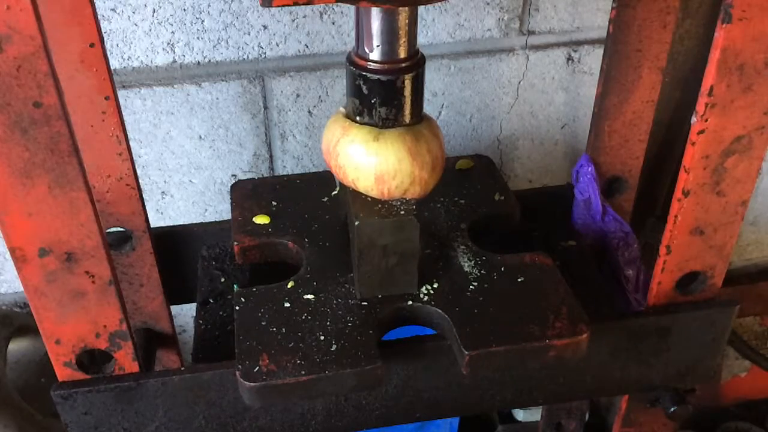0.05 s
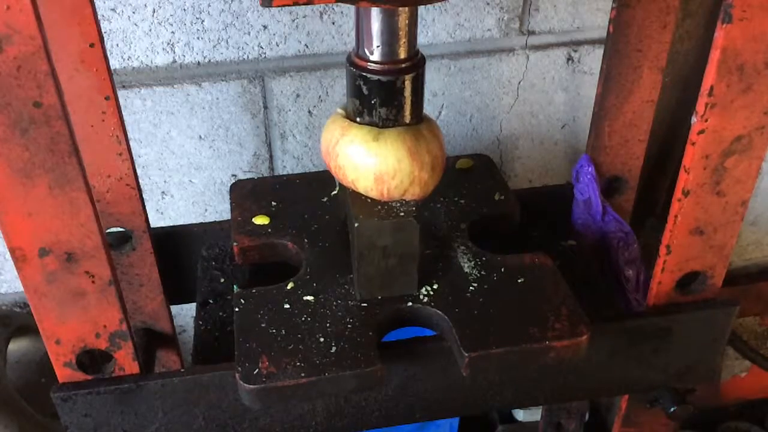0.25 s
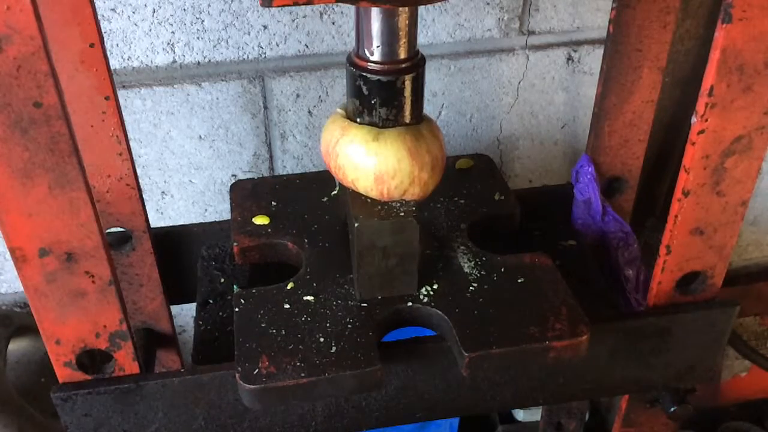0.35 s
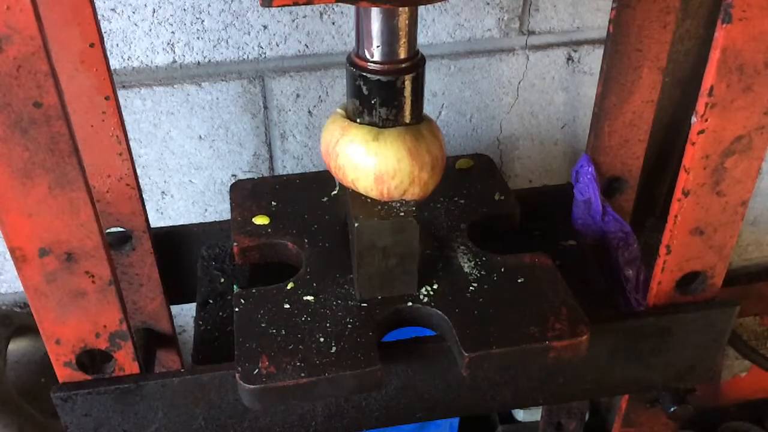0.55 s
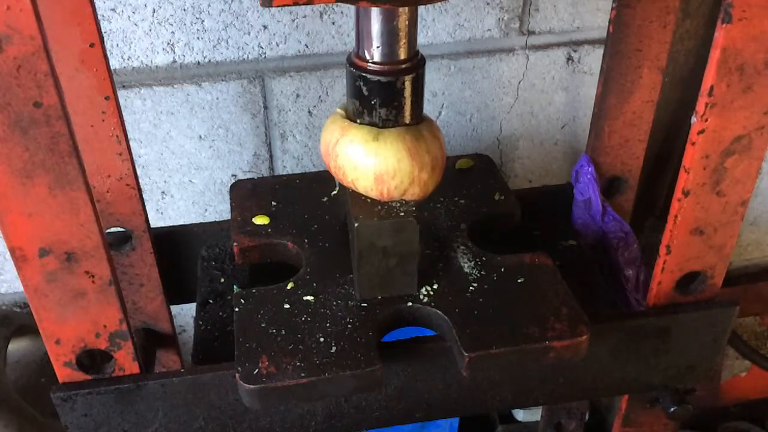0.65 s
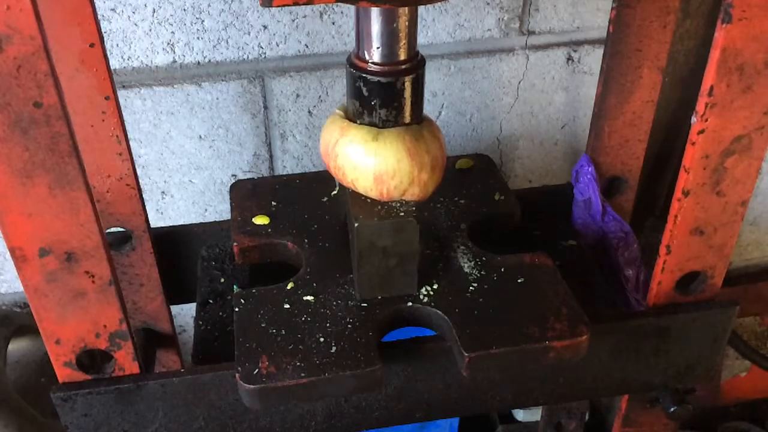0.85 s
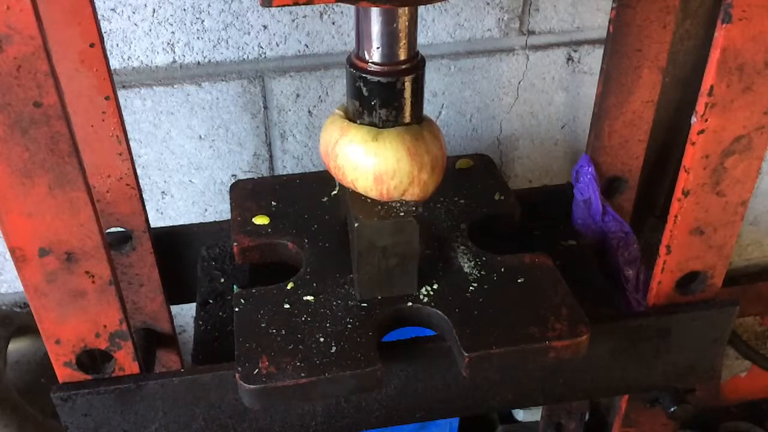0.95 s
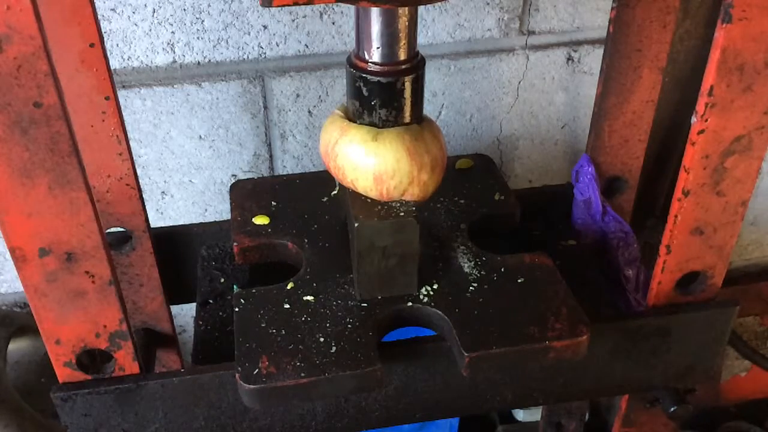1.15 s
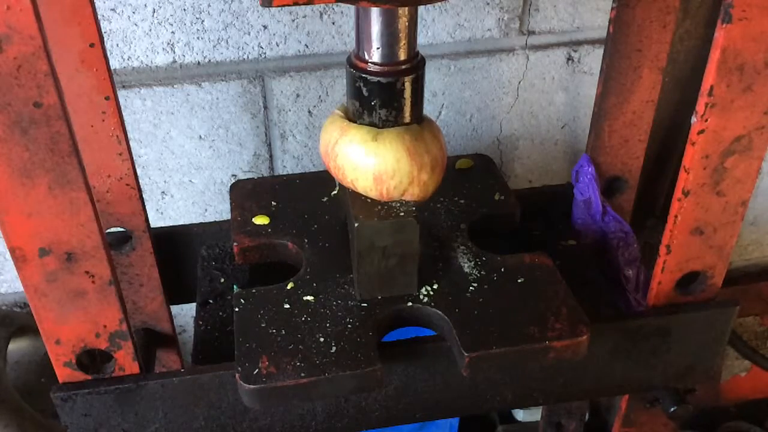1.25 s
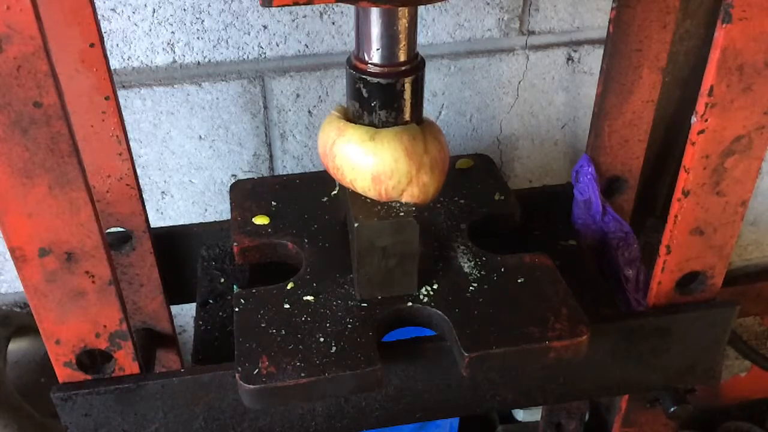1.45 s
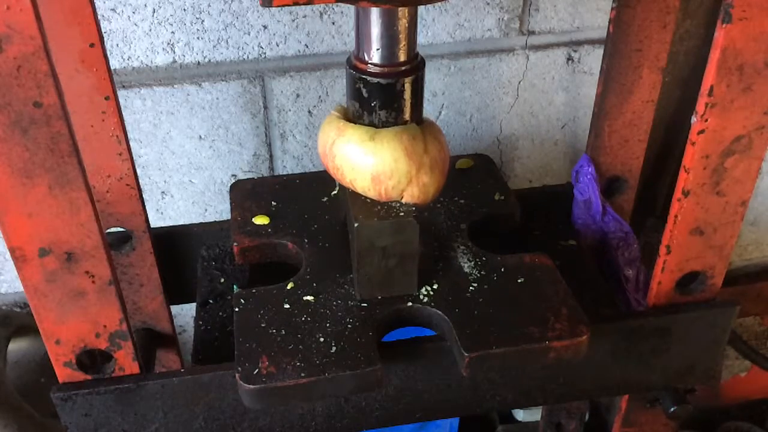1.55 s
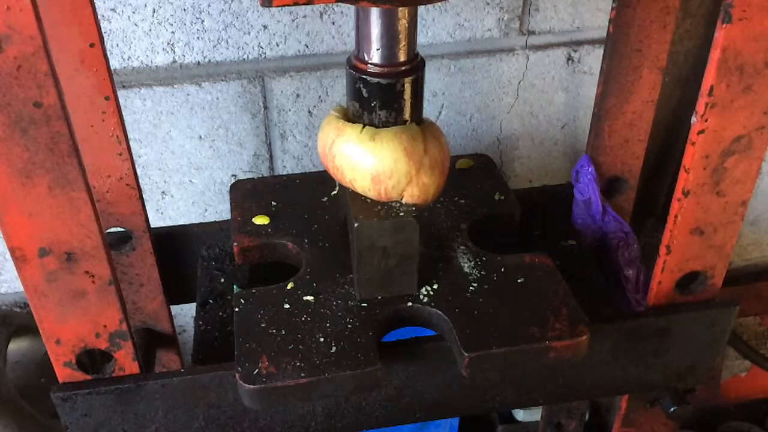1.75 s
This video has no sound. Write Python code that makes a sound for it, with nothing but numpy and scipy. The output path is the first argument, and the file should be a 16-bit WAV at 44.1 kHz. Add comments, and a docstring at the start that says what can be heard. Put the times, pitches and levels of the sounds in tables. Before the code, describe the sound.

Sharp cracks and a soft fizz of juice come from an apple squeezed in a workshop hydraulic press. Three pump strokes knock faintly: the first brings cracking and a thud, the second scattered snaps, the third crowded cracks that thin out.

```python
"""A hydraulic press slowly crushes an apple in a workshop, over low room noise and a faint hum.
A pump stroke knocks through the steel frame and pushes the ram on: juice fizzes out of the flesh,
the skin cracks, and at about 0.23 s the fruit gives way and the frame thuds. The piston returns softly.
A second stroke near 0.7 s brings weaker fizz and a few single cracks. After the third, near 1.3 s,
the cracks crowd together, then thin out as the piston returns once more."""
import sys
import numpy as np
from scipy import signal
from scipy.fft import rfft, irfft, next_fast_len
from scipy.io import wavfile

SR = 44100
rng = np.random.default_rng(int(sys.argv[2]) if len(sys.argv) > 2 else 0)


def output_pcm(signal):
    """Save a mono or channel-first signal as 16-bit PCM at the path in sys.argv[1].

    Samples are clipped to [-1, 1] before scaling.
    """
    pcm = np.clip(np.atleast_2d(signal).T, -1, 1) * 32767
    wavfile.write(sys.argv[1], SR, np.round(pcm).astype(np.int16))


N = 79380
T = np.arange(N) / SR
SIZE = next_fast_len(N + SR // 2)
HZ = np.maximum(np.fft.rfftfreq(SIZE, 1 / SR), 1)
CUTOFF_HZ = 15200


def from_db(db):
    """Amplitude ratio of a level in decibels."""
    return 10 ** (np.asarray(db) / 20)


def unit_energy(x):
    """Normalisation to an energy of 1."""
    return x / np.sqrt(np.sum(x ** 2) + 1e-20)


def unit_rms(x):
    """Normalisation to an rms of 1."""
    return unit_energy(x) * np.sqrt(len(x))


def decay(t60):
    """Exponential damping: 60 dB in t60 seconds."""
    return np.exp(-np.minimum(np.log(1000) * T / t60, 40))


def spectrum_db(points):
    """Spectral envelope through (Hz, dB) points, interpolated in log frequency."""
    hz, db = np.transpose(points)
    return np.interp(np.log(HZ), np.log(hz), db)


def resonance(hz, half_width_hz):
    """Lorentzian resonance curve of height 1."""
    return 1 / (1 + ((HZ - hz) / half_width_hz) ** 2)


def colour(x, db):
    """Minimum-phase filtering: folding the cepstrum makes the given spectrum causal."""
    cepstrum = irfft(np.log(from_db(db)), SIZE)
    cepstrum[1:SIZE // 2] *= 2
    cepstrum[SIZE // 2 + 1:] = 0
    return irfft(rfft(x, SIZE) * np.exp(rfft(cepstrum)), SIZE)[:N]


def butterworth(x, hz, kind, order):
    """Maximally flat low- or high-pass filtering."""
    return signal.sosfilt(signal.butter(order, hz, kind, fs=SR, output="sos"), x)


def add(out, start_s, x):
    """Superposition of x on out from start_s on."""
    start = int(start_s * SR)
    out[start:] += x[:N - start]


def ringing(modes):
    """Modal impulse response: damped sinusoids of alternating sign."""
    return sum((-1) ** k * from_db(db) * decay(t60) * np.sin(2 * np.pi * hz * T)
               for k, (hz, db, t60) in enumerate(modes))


def struck(blows, modes):
    """Impact excitation: a softer blow has a lower corner frequency and excites fewer high modes."""
    out, ring = np.zeros(N), ringing(modes)
    for start_s, db, corner_hz in blows:
        add(out, start_s, from_db(db) * butterworth(ring, corner_hz, "low", order=2))
    return out


def background():
    """Low room noise and a hum that wavers by random amplitude and frequency modulation."""
    # Each row: frequency in Hz, relative level in dB.
    air_spectrum = [(20, -40), (45, -5.5), (65, -0.5), (100, -1), (140, -8.5), (280, -15), (430, -8),
                    (650, -17.5), (1300, -15.5), (2500, -29), (5000, -40.5), (15000, -39.5)]
    hum_hz, waver_hz, waver_db = 201.7, 1.62, 3.5
    air, waver = rng.standard_normal((2, SIZE))
    air = irfft(rfft(air) * from_db(spectrum_db(air_spectrum)), SIZE)[:N]
    waver = unit_rms(irfft(rfft(waver) * resonance(0, waver_hz), SIZE)[:N])
    phase = 2 * np.pi * np.cumsum(hum_hz + waver_hz * waver) / SR
    hum = from_db(waver_db * waver) * np.sin(phase)
    return from_db(-63.5) * unit_rms(air) + from_db(-69) * unit_rms(hum)


def reverberation(x, t60):
    """Reflections from the block walls build a diffuse field that decays exponentially."""
    # Each row: frequency in Hz, gain in dB.
    room_spectrum = [(60, -8), (500, -0.5), (1000, 2.5), (2300, 3), (5000, -2.5), (15000, 6.5)]
    build_s = 0.0062
    tail = unit_energy(rng.standard_normal(N) * decay(t60) * (1 - np.exp(-T / build_s)))
    return signal.fftconvolve(x, colour(tail, spectrum_db(room_spectrum)))[:N]


def linkage():
    """The pump linkage rattles: damped noise bursts, with the free vibration of a small steel part."""
    # Each row: start in seconds, noise level in dB, its t60 in seconds, level of the steel ring in dB.
    rattles = [(0, -57.5, 0.15, -56), (0.042, -42.5, 0.068, -44.5), (0.349, -56, 0.16, -73),
               (0.358, -57, 0.042, -76), (.656, -55.5, 0.064, -62.5), (.695, -57.5, 0.17, -70),
               (.981, -54.5, 0.045, -78), (.994, -51.5, 0.043, -76), (1.2895, -54, .05, -64),
               (1.326, -49.5, .05, -70)]
    # Each row: frequency in Hz, relative level in dB.
    rattle_spectrum = [(100, 2.5), (400, 2.5), (1000, -3), (1500, -8.5), (1880, 0.5), (2300, -9.5),
                       (3200, -14), (6000, -17), (15000, -24.5)]
    # Each row: frequency in Hz, level in dB, t60 in seconds.
    steel_modes = [(5108, 0.5, 0.032), (5155, -3.5, 0.095), (5670, -3, .04)]
    attack_s = 0.0015
    out, steel = np.zeros(N), ringing(steel_modes)
    for start_s, db, t60, steel_db in rattles:
        noise = unit_rms(colour(rng.standard_normal(N), spectrum_db(rattle_spectrum)))
        envelope = (1 - np.exp(-T / attack_s)) * decay(t60)
        add(out, start_s, from_db(db) * noise * envelope / envelope.max() + from_db(steel_db) * steel)
    return out


def piston_returns():
    """Soft impacts excite the piston's modes as it returns."""
    # Each row: start in seconds, level in dB, corner frequency in Hz.
    blows = [(.334, -50.5, 497), (.363, -53, 704), (.9665, -46, 480), (.9955, -51, 905),
             (1.604, -45.5, 494), (1.632, -52.5, 865)]
    # Each row: frequency in Hz, level in dB, t60 in seconds.
    piston_modes = [(125, -14, 0.089), (210, 2, 0.036), (410, -4.5, 0.041), (480.4, -2, 0.093),
                    (546, 0.5, 0.058)]
    return struck(blows, piston_modes)


def pump_knocks():
    """Structure-borne sound: each pump stroke knocks through the steel."""
    # Each row: start in seconds, level in dB, corner frequency in Hz.
    blows = [(.0325, -40.5, 603), (.0425, -38.5, 313), (.6615, -53, 1000), (.6895, -39.5, 383),
             (.6975, -38, 646), (.706, -35, 197), (.786, -55, 600), (1.291, -49, 1000), (1.3195, -40, 760),
             (1.3295, -36, 715), (1.351, -65, 445)]
    # Each row: frequency in Hz, level in dB, t60 in seconds.
    pump_modes = [(131, -10.5, 0.067), (222.6, -3.5, 0.046), (310, -4.5, 0.034), (409.6, 1.5, 0.053),
                  (476, 2, 0.024), (671, -16, 0.15), (953, -5, 0.025), (1164, -10, 0.041)]
    return struck(blows, pump_modes)


def frame_thud():
    """Transient excitation: the frame's low modes ring as the apple gives way."""
    # Each row: start in seconds, level in dB, corner frequency in Hz.
    blows = [(.2225, -41, 304), (.2292, -16.5, 470), (.2352, -21, 950), (.2665, -26.5, 194),
             (.2870, -37, 219)]
    # Each row: frequency in Hz, level in dB, t60 in seconds.
    frame_modes = [(101, -21, 0.014), (149, -10, 0.14), (155.5, 0.5, 0.033), (222, -11.5, 0.088),
                   (264.1, -8.5, 0.16), (343, -11.5, 0.02), (423, -9.5, 0.047), (537, -13.5, 0.036),
                   (640, -6, 0.07), (788, -12, 0.031), (909, -9.5, 0.041)]
    return struck(blows, frame_modes)


def press_bed(x):
    """Resonances of the press bed colour the sound of the fruit."""
    # Each row: centre in Hz, half-width in Hz, gain at the centre in dB.
    bands = [(436, 150, 4.5), (772, 51, 3.4), (1167, 20, 4.6), (1700, 114, 3.9), (1900, 44, 0.75),
             (2696, 95, 4.76), (9400, 210, -0.5)]
    return colour(x, sum(db * resonance(hz, half_width) for hz, half_width, db in bands))


def juice():
    """Shot noise: countless cells burst as tiny grains over a fine hiss, one swell per pump stroke."""
    # Each row: time in seconds, level in dB.
    swells = [(0, -62.5), (.065, -70), (0.104, -59.5), (.165, -52.5), (.196, -53.5), (0.204, -38),
              (0.234, -45.5), (.252, -65.5), (.32, -68.5), (.55, -76.5), (.70, -75.5), (.745, -62.5),
              (.80, -57), (.88, -60), (.93, -66), (1.0, -65), (1.06, -71.5), (1.18, -72.5), (1.36, -66.5),
              (1.385, -56), (1.45, -51), (1.468, -48), (1.50, -51), (1.545, -53.5), (1.58, -59.5),
              (1.65, -62), (1.71, -65.5), (1.8, -70)]
    # Each row: frequency in Hz, relative level in dB.
    fizz_spectrum = [(200, -34), (700, -4.5), (1200, -5), (2600, -0.5), (4500, 1.5), (7000, 0.5),
                     (10000, 2.5), (15000, -1.5)]
    grains_per_s, spread_db, grain_t60, hiss_share = 1000, 4, 0.006, 0.6
    sizes = from_db(spread_db * np.minimum(rng.exponential(1, N), 5)) * rng.choice([-1, 1], N)
    onsets = rng.random(N) < grains_per_s / SR
    # Incoherent grains add in power.
    power = np.abs(signal.fftconvolve((sizes * onsets) ** 2, decay(grain_t60) ** 2)[:N])
    grains = unit_rms(np.sqrt(power) * rng.standard_normal(N))
    fizz = np.sqrt(1 - hiss_share) * grains + np.sqrt(hiss_share) * rng.standard_normal(N)
    times, db = np.transpose(swells)
    return from_db(np.interp(T, times, db)) * unit_rms(colour(fizz, spectrum_db(fizz_spectrum)))


def cavity(fundamental_hz):
    """Cavity resonance: a fresh split rings as a small hollow."""
    # Each row: multiple of the fundamental, spectral peak in dB, cycles to decay by 60 dB.
    partials = [(1, 10, 17.2), (2, 1, 66), (3.4, 3.5, 90)]
    modes = []
    for ratio, peak_db, cycles in partials:
        hz = ratio * fundamental_hz
        t60 = cycles / hz
        resonant_gain = t60 * SR / (2 * np.log(1000))
        if hz < CUTOFF_HZ:
            modes.append((hz, peak_db - 20 * np.log10(resonant_gain), t60))
    return ringing(modes)


def cracks():
    """Fracture of skin and flesh: a snap, then the flesh, the cavity and the steel bed plate ring."""
    # Each row: start in seconds, level in dB, high-pass corner in Hz (big cracks tend to reach lower),
    # cavity fundamental in Hz, treble gain in dB, t60 of the flesh in seconds.
    fractures = [(0.1479, -41, 3500, 11000, 8.5, 0.016), (0.1772, -20.5, 1920, 3220, 2, 0.053),
                 (0.204, -19.5, 2440, 2470, 5, 0.036), (0.2063, -14.5, 1990, 9350, -13, 0.031),
                 (0.2139, -18, 2250, 2700, -9, 0.048), (0.2314, -21.5, 880, 3240, 1, 0.079),
                 (0.2811, -33.5, 2500, 3900, 4, 0.037), (.3012, -42, 2500, 4500, -9, .02),
                 (0.758, -30.5, 2000, 6000, 3.5, 0.023), (.9167, -10.5, 586, 832, 1, 0.045),
                 (0.9355, -40, 980, 10900, 4, 0.019), (.9925, -35, 1210, 2240, 6, 0.031),
                 (1.1846, -23.5, 1530, 4000, -9, 0.06), (1.1986, -5, 1520, 1138, -11.5, 0.044),
                 (1.3721, -15, 1590, 836, -8, 0.04), (1.4005, -31, 1800, 2980, 7, 0.03),
                 (1.4386, -39.5, 2000, 9500, 11, .02), (1.4546, -32, 2000, 9900, 14, 0.018),
                 (1.4558, -23, 1810, 9400, -5, 0.0053), (1.4586, -6.5, 290, 1624, 6.5, 0.041),
                 (1.4668, -33.5, 2000, 12300, 16, 0.01), (1.472, -17, 1200, 2750, 5, 0.065),
                 (1.4749, -26.5, 1510, 9300, 14, 0.038), (1.4857, -35.5, 2500, 9400, 22.5, 0.0098),
                 (1.4967, -28, 2500, 9600, 9, 0.034), (1.5023, -15.5, 1110, 1320, 0, 0.037),
                 (1.5132, -32, 1500, 9000, -3, 0.035), (1.527, -23.5, 2030, 2780, 6, 0.094),
                 (1.5355, -20, 2000, 2600, -4, 0.037), (1.5373, -22, 2050, 2700, 7.5, 0.041),
                 (1.5528, -27, 1310, 2670, 2, 0.027), (1.6298, -24.5, 1760, 1900, -1, 0.034),
                 (1.6341, -16.5, 1800, 1253, 0.5, 0.03), (1.6648, -39, 1770, 2600, 7, 0.016),
                 (1.709, -40.5, 2490, 3300, 11.5, 0.026), (1.784, -43, 2410, 9500, 3, .015)]
    # Each row: frequency in Hz, relative level in dB, t60 in seconds.
    plate_modes = [(322, -16, 0.025), (422, 6, 0.053), (642, 10, 0.071), (1222, 11, 0.066),
                   (1400, -9, 0.037), (1590, -5.5, 0.017), (1906, 3, 0.038), (2030, 1.5, 0.092),
                   (2250, -22, 0.097), (2600, 13, 0.051), (2675, -11, .05), (3600, -38, 0.049),
                   (9640, -9, 0.077)]
    snap_rise_s, snap_t60 = 0.0001, 0.0031
    snap_envelope = decay(snap_t60) * (1 - np.exp(-T / snap_rise_s))
    treble_shelf = 1 / (1 + (6500 / HZ) ** 4)
    plate = from_db(-11.5) * unit_energy(ringing(plate_modes))
    out = np.zeros(N)
    for start_s, db, low_hz, cavity_hz, treble_db, t60 in fractures:
        snap_noise, flesh_noise = rng.standard_normal((2, N))
        snap = from_db(-3) * unit_energy(snap_noise * snap_envelope)
        flesh = from_db(2) * butterworth(unit_energy(flesh_noise * decay(t60)), 4070, "low", order=1)
        crack = butterworth(snap + flesh + plate + cavity(cavity_hz), low_hz, "high", order=2)
        add(out, start_s, colour(crack, db + treble_db * treble_shelf))
    return out


def scene():
    """Superposition of the direct sound of fruit and press, their reverberation and the background."""
    fruit = press_bed(cracks() + juice())
    press = frame_thud() + pump_knocks() + piston_returns() + linkage()
    press = butterworth(press, 69, "high", order=3)
    fruit_tail = from_db(-19) * reverberation(fruit, t60=0.31)
    press_tail = from_db(-10.5) * reverberation(press, t60=0.19)
    return (fruit + press + fruit_tail + press_tail + background())[None]


def record(dry):
    """Band limiting: an elliptic low-pass cuts the highest treble steeply."""
    return signal.sosfilt(signal.ellip(10, .2, 70, CUTOFF_HZ, fs=SR, output="sos"), dry)


dry = scene()
out = record(dry)
output_pcm(out)
```